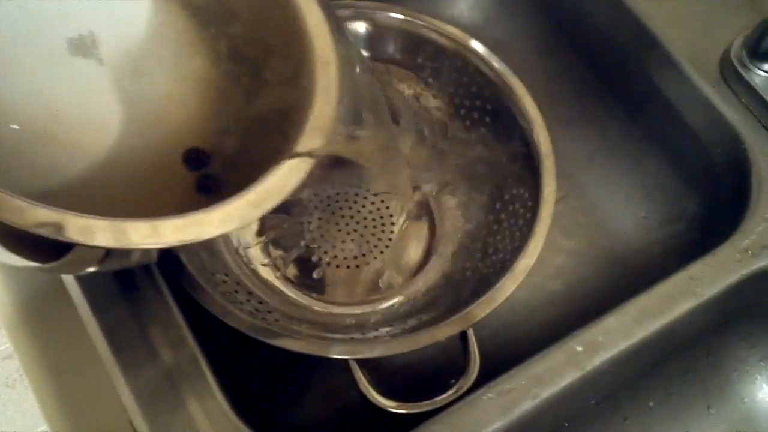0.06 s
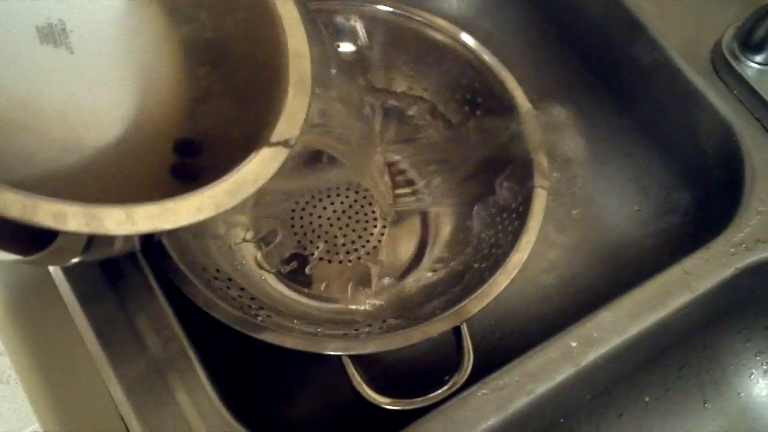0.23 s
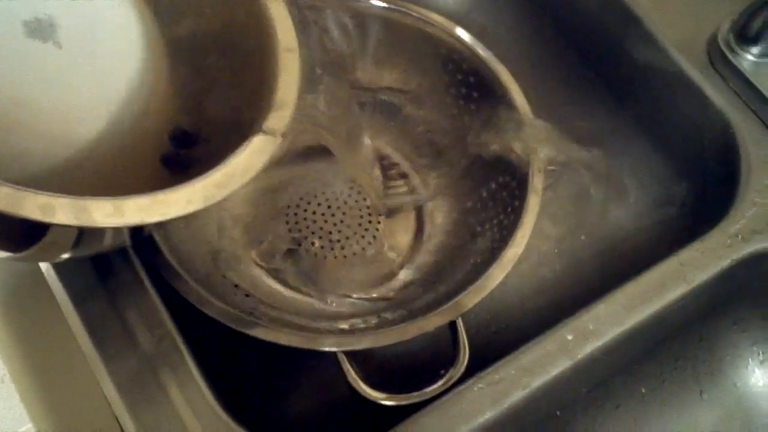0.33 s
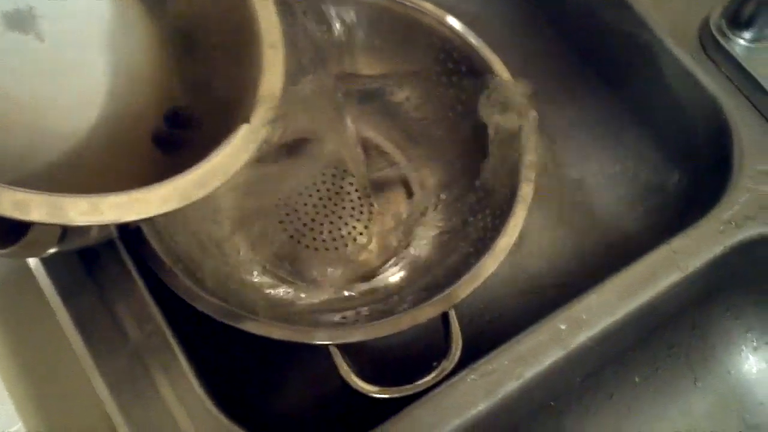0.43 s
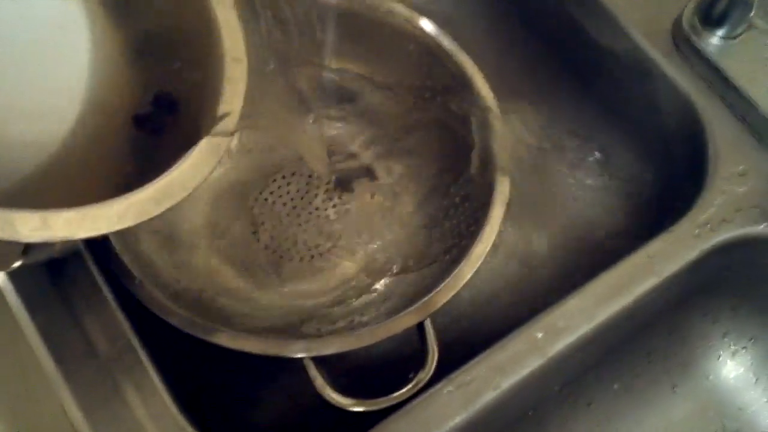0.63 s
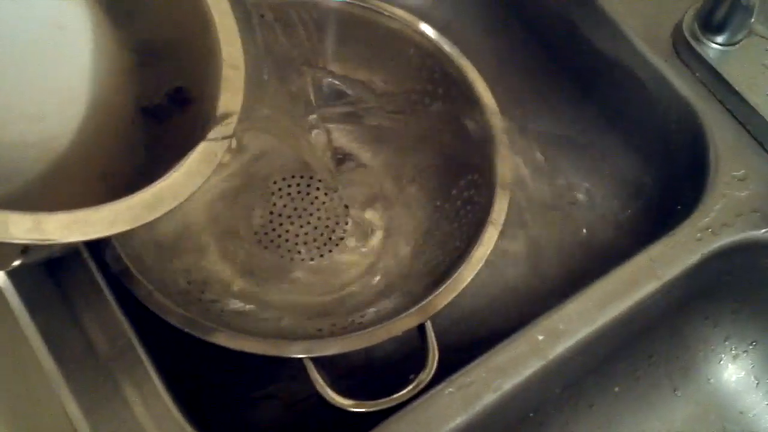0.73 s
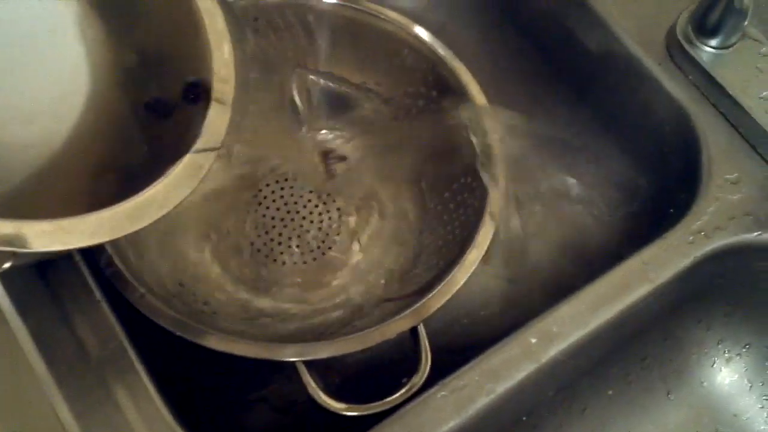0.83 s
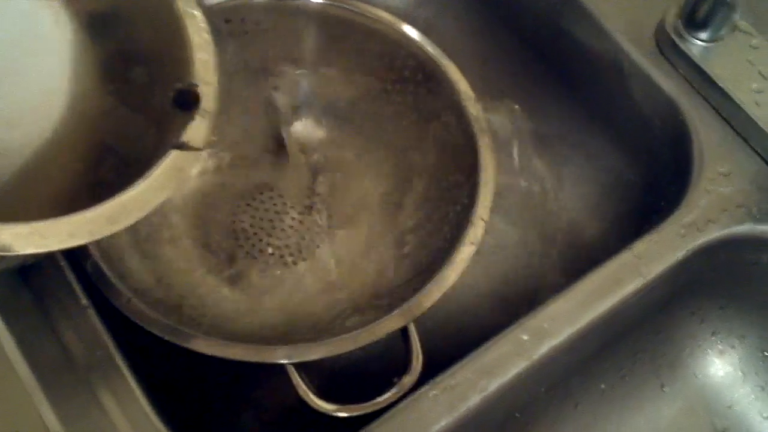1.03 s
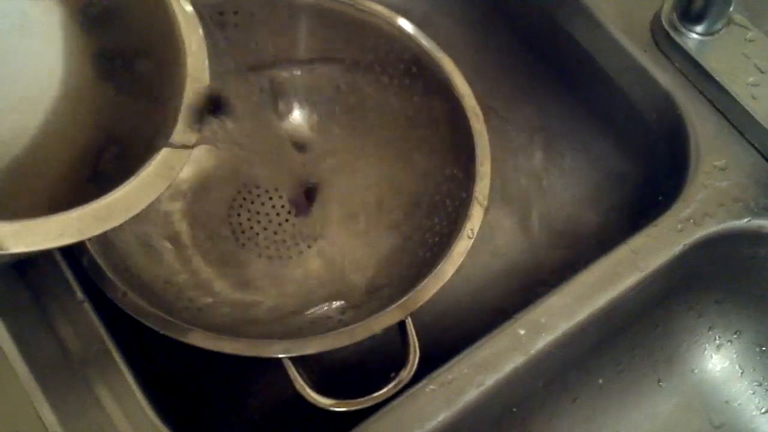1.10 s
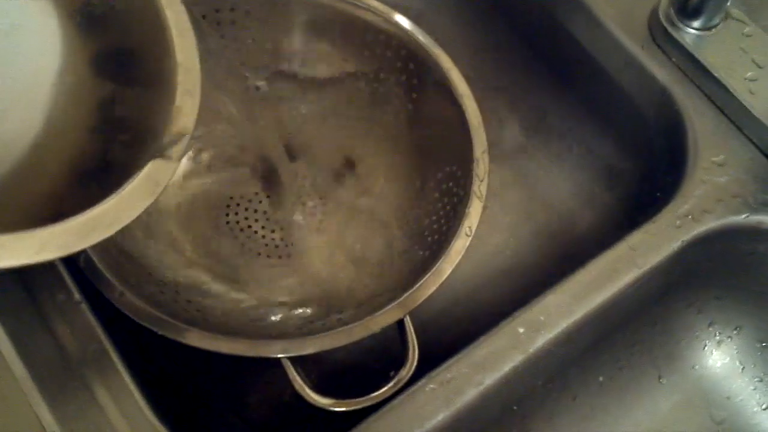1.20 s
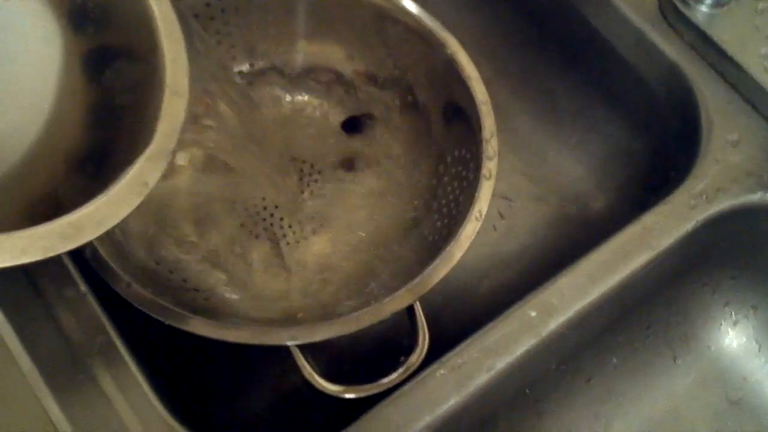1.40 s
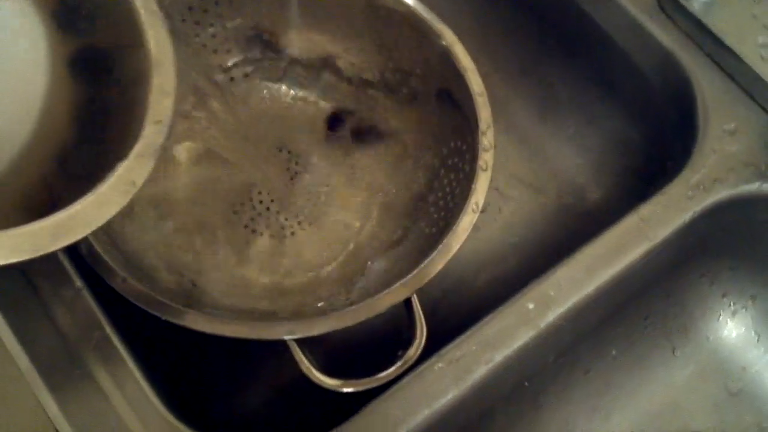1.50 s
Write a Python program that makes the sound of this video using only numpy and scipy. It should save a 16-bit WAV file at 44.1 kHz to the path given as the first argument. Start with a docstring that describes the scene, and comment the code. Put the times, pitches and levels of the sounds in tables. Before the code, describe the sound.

Water pours into a metal colander in a steel kitchen sink, hissing through the holes and splashing close by. It swells and bubbles, then two berries drop in with short metallic knocks, over a faint low rumble.

```python
"""A steel kitchen sink: water is poured from a bowl into a metal colander, over a low rumble.
Fine jets hiss through the holes and splashes burst on the mesh. The water churns, traps ringing
bubbles and drums on the sink. Two berries fall out and knock on the metal; the rim rings on.
Above the bass one channel is the other inverted and slightly late; the sides swap now and then."""
import sys
import numpy as np
from scipy import signal
from scipy.fft import rfft, irfft, next_fast_len
from scipy.io import wavfile

SR = 44100
rng = np.random.default_rng(int(sys.argv[2]) if len(sys.argv) > 2 else 0)


def output_pcm(signal):
    """Save a mono or channel-first signal as 16-bit PCM at the path in sys.argv[1].

    Samples are clipped to [-1, 1] before scaling.
    """
    pcm = np.clip(np.atleast_2d(signal).T, -1, 1) * 32767
    wavfile.write(sys.argv[1], SR, np.round(pcm).astype(np.int16))


N = 68355

# modes of colander and sink: pitch_hz, t60_s, water_db, first_berry_db, second_berry_db
METAL_MODES = [(220, 0.086, -8, -23, -10), (346.8, 0.13, 0, -6, -21), (396.5, 0.054, 0, -10, -4),
               (458, 0.096, -11.5, -0.5, -9.5), (542, 0.068, -5.5, -16, -7), (644.5, 0.049, -3.5, -4, -26),
               (700, 0.038, -6, -27, -9), (840, 0.06, -21, -19, -12.5), (1050, 0.018, -12, -9, -19),
               (1154, 0.018, -2, -10.5, -7.5), (1211, 0.017, -14, 0, -4), (1472, 0.066, -8, -11, -19.5),
               (1533, 0.014, 0, -8, -8), (1710, 0.017, 18, -5.5, -37), (2080, 0.014, -27, -45, -7.5),
               (2443, 0.022, -1, -2, -11)]
# long-ringing modes of the colander's rim: pitch_hz, t60_s, water_db, berry_db
RIM_MODES = [(315.2, 0.57, -42, -30), (373.8, 0.18, -37.5, -35), (658, 0.3, -39.5, -23.5),
             (966, 0.28, -44.5, -31.5), (1228, 0.29, -52, -24)]


def from_db(db):
    """Level to gain."""
    return 10 ** (np.asarray(db) / 20)


def rms_one(x):
    """Scale to rms 1."""
    return x / np.sqrt(np.mean(x ** 2) + 1e-20)


def envelope(rows):
    """Gain per sample from rows of time_s, level_db."""
    time_s, level_db = np.transpose(rows)
    return from_db(np.interp(np.arange(N) / SR, time_s, level_db))


def butterworth(x, order, edges_hz, kind):
    """Causal low, high or band pass."""
    return signal.sosfilt(signal.butter(order, edges_hz, kind, fs=SR, output="sos"), x)


def drift(rate_hz):
    """Smooth random curve, rms about 1."""
    hop, settle = 40, 2000
    pole = np.exp(-2 * np.pi * rate_hz * hop / SR)
    white = rng.standard_normal(N // hop + settle + 2)
    slow = signal.lfilter([1], [1, -2 * pole, pole * pole], white)[settle:]
    return np.interp(np.arange(N) / hop, np.arange(len(slow)), rms_one(slow))


def ring(force, pitch_hz, t60_s):
    """Resonator: a unit click starts a decaying sine of height 1."""
    radius, angle = from_db(-60 / (t60_s * SR)), 2 * np.pi * pitch_hz / SR
    return signal.lfilter([0, np.sin(angle)], [1, -2 * radius * np.cos(angle), radius ** 2], force + 1e-18)


def level_at(spectrum, hz):
    """Level in dB, interpolated over log frequency."""
    freq_hz, level_db = np.transpose(spectrum)
    return np.interp(np.log(hz), np.log(freq_hz), level_db)


def banded_noise(spectrum, patchy_db, together_db, rate_hz):
    """Third-octave noise bands flickering singly and together; rms 1."""
    out, together = 0, drift(rate_hz)
    low_hz, high_hz = spectrum[0][0], spectrum[-1][0]
    edges_hz = low_hz * 2 ** np.arange(0, np.log2(high_hz / low_hz) + .3, 1 / 3)
    white = rng.standard_normal((2, N))
    for k, (low, high) in enumerate(zip(edges_hz, edges_hz[1:])):
        band = butterworth(white[k % 2], 2, [low, high], "band")
        flicker_db = together_db * together + patchy_db * drift(rate_hz)
        out += from_db(level_at(spectrum, np.sqrt(low * high)) + flicker_db) * band
    return rms_one(out)


def grains(spectrum, per_s, spread_db, t60_cycles, pitches):
    """Clumped random clicks dealt to short resonators across a spectrum; rms 1."""
    sizes = from_db(spread_db * np.minimum(rng.exponential(1, N), 4)) * rng.choice([-1, 1], N)
    born = rng.random(N) < per_s * from_db(3.0 * drift(25)) / SR
    out, dealt = 0, rng.integers(0, pitches, N)
    for k, hz in enumerate(np.geomspace(spectrum[0][0], spectrum[-1][0], pitches)):
        clicks = sizes * born * (dealt == k)
        out += from_db(level_at(spectrum, hz)) * hz * ring(clicks, hz, t60_cycles / hz)
    return rms_one(out)


def rumble():
    """Low, wavering kitchen noise."""
    # rumble colour: freq_hz, density_db
    spectrum = [(60, -33), (90, 7.5), (120, 0), (170, 3.5), (240, 1.5), (400, 8)]
    return from_db(-53) * banded_noise(spectrum, patchy_db=3.0, together_db=-2.0, rate_hz=8.0)


def sink_hum():
    """Low hum in the sink: noise through one resonance twice."""
    # hum level: time_s, level_db
    levels = [(0, -70), (.6, -68.5), (.66, -54), (.78, -50.5), (.9, -57.5), (.98, -77), (1.45, -82),
              (1.52, -49.5), (1.55, -64)]
    pitch_hz, t60_s = 168.6, 0.087
    narrow_noise = ring(rng.standard_normal(N), pitch_hz, t60_s)
    return envelope(levels) * rms_one(ring(narrow_noise, pitch_hz, t60_s))


def metal(force, gains):
    """Colander and sink modes under a force; thin sheet radiates no bass."""
    modes = sum(gain * ring(force, hz, t60_s) for (hz, t60_s, *_), gain in zip(METAL_MODES, gains))
    return butterworth(modes, 4, 283, "high")


def rim(force, gains):
    """The rim sings on after the sheet has died."""
    return sum(gain * ring(force, hz, t60_s) for (hz, t60_s, *_), gain in zip(RIM_MODES, gains))


def drumming():
    """Falling water shakes the metal's low modes."""
    # drumming level: time_s, level_db
    levels = [(0, -48), (.2, -66), (.25, -48.5), (.4, -45), (.52, -42.5), (.62, -56), (.78, -60),
              (.93, -51), (.96, -35.5), (1.06, -44), (1.12, -37), (1.19, -31), (1.22, -45), (1.27, -39),
              (1.36, -39.5), (1.45, -47), (1.51, -40.5), (1.55, -55)]
    uneven_noise = rng.standard_normal(N) * from_db(2.2 * drift(50.0))
    force = butterworth(uneven_noise, 2, 534, "low")
    water_db, signs = np.transpose(METAL_MODES)[2], (-1) ** np.arange(len(METAL_MODES))
    return envelope(levels) * rms_one(metal(force, signs * from_db(water_db)))


def wash():
    """Churning water with small bubbles; it also rings the rim."""
    # wash level: time_s, level_db
    levels = [(0, -54), (.12, -53.5), (.25, -51), (.45, -48), (.6, -46), (.72, -47), (.8, -44.5),
              (.92, -43), (1.05, -42.5), (1.10, -35), (1.21, -45), (1.27, -37.5), (1.36, -45.5),
              (1.45, -47.5), (1.55, -49)]
    # wash colour: freq_hz, density_db
    spectrum = [(450, 7.5), (700, 3.5), (1000, 1), (1500, 1), (2200, 2), (3000, -6.5)]
    small_bubbles = grains(spectrum, per_s=400, spread_db=1.0, t60_cycles=22, pitches=30)
    churn = banded_noise(spectrum, patchy_db=2.2, together_db=.6, rate_hz=30.0)
    water_db = np.transpose(RIM_MODES)[2]
    ringing = rim(rng.standard_normal(N), from_db(water_db))
    return envelope(levels) * (churn + from_db(-8.5) * small_bubbles + ringing)


def large_bubbles():
    """Trapped air rings as unsteady sines that rise a little."""
    # bubbles: start_s, level_db, pitch_hz, t60_s
    bubbles = [(.258, -42.5, 1546, 0.047), (.456, -32, 2280, 0.058), (.534, -34.5, 1664, 0.075),
               (.736, -48, 2022, 0.072), (.825, -38.5, 1100, 0.26), (0.846, -30, 1900, 0.024),
               (.78, -36, 508, 0.11), (0.875, -29.5, 1021, 0.1), (0.938, -37, 1817, 0.22),
               (.983, -26.5, 1548, 0.069), (.986, -28, 1860, .03)]
    rise, attack_s, wobble_rad = 0.077, 0.0019, 0.45
    out, t = np.zeros(N), np.arange(N) / SR
    for start_s, level_db, pitch_hz, t60_s in bubbles:
        age_s = np.maximum(t - start_s, 0)
        glide = 1 + rise * np.minimum(age_s / t60_s, 1)
        phase = 2 * np.pi * pitch_hz * age_s * glide + wobble_rad * drift(48.0)
        out += from_db(level_db - 60 * age_s / t60_s) * np.minimum(age_s / attack_s, 1) * np.sin(phase)
    return out


def berry_knocks():
    """Each touch is a soft click striking the modes of its spot in step, plus a crack of noise."""
    # touches on the metal, one list per berry: start_s, level_db, cutoff_hz
    berries = [
        [(1.0747, -8, 4650), (1.0763, -12, 4500), (1.0778, -4, 3500), (1.083, -11.5, 1710)],
        [(1.2313, -11.5, 4140), (1.2343, -9.5, 2410), (1.2370, -11.5, 1740), (1.2425, -17, 1610),
         (1.269, -31, 865)],
    ]
    crack_db, crack_t60_s, crack_low_hz, crack_high_hz = -14.5, 0.032, 1500, 6000
    spots_db, rim_db = np.transpose(METAL_MODES)[3:], np.transpose(RIM_MODES)[3]
    out, crack_gain, t = np.zeros(N), np.zeros(N), np.arange(N) / SR
    for touches, spot_db in zip(berries, spots_db):
        force = np.zeros(N)
        for start_s, level_db, cutoff_hz in touches:
            click = np.zeros(N)
            click[int(start_s * SR)] = -from_db(level_db) * SR / (32 * cutoff_hz)
            force += butterworth(click, 2, cutoff_hz, "low")
            decay = (t >= start_s) * from_db(-60 * np.maximum(t - start_s, 0) / crack_t60_s)
            crack_gain += from_db(level_db + crack_db) * decay * cutoff_hz / crack_high_hz
        out += metal(force, from_db(spot_db)) + rim(force, from_db(rim_db))
    crack = crack_gain * rng.standard_normal(N)
    return out + butterworth(crack, 1, [crack_low_hz, crack_high_hz], "band")


def splashes():
    """Water hits the mesh: fast-starting, decaying noise bursts, each in its own band."""
    # splashes: start_s, level_db, centre_hz, width_hz, t60_s
    bursts = [(0.075, -43, 8940, 2050, 0.36), (0.199, -32, 6200, 1510, 0.072),
              (0.211, -31, 7100, 2950, 0.23), (0.277, -34, 7540, 6000, 0.48),
              (0.307, -39.5, 2430, 1000, 0.1), (0.335, -30.5, 6740, 2520, .08),
              (0.409, -26.5, 5700, 2340, 0.08), (0.48, -26, 8100, 4860, 0.034),
              (0.51, -37.5, 8400, 2500, 0.24), (0.559, -40, 6800, 1970, 0.28),
              (0.606, -32, 6140, 1500, 0.15), (0.642, -30, 5000, 1810, 0.096),
              (0.656, -22.5, 8500, 1990, 0.024), (0.677, -32, 8350, 1500, 0.033),
              (0.691, -33.5, 4850, 1490, 0.22), (0.731, -20, 6160, 3170, 0.08),
              (0.731, -33.5, 2210, 1270, 0.18), (.757, -22.5, 7340, 4100, 0.053),
              (0.798, -35.5, 6060, 2900, 0.21), (0.889, -30, 6000, 5500, 0.097),
              (0.965, -31.5, 9100, 6640, 0.37), (1.0739, -23.5, 4800, 6600, 0.089),
              (1.168, -34, 8300, 2480, 0.063), (1.224, -33, 8500, 2500, 0.041),
              (1.227, -29, 4800, 2560, 0.063), (1.232, -33, 6350, 5100, 0.15),
              (1.246, -36.5, 8600, 1990, 0.1), (1.271, -33.5, 5600, 2460, 0.11),
              (1.323, -26, 11600, 3000, 0.01)]
    attack_s = 0.001
    out, t = np.zeros(N), np.arange(N) / SR
    for start_s, level_db, centre_hz, width_hz, t60_s in bursts:
        edges_hz = np.clip([centre_hz - width_hz / 2, centre_hz + width_hz / 2], 300, .45 * SR)
        noise = rms_one(butterworth(rng.standard_normal(N), 3, edges_hz, "band"))
        age_s = np.maximum(t - start_s, 0)
        out += from_db(level_db - 60 * age_s / t60_s) * np.minimum(age_s / attack_s, 1) * noise
    return out


def droplet_ticks(per_s, size_db, t60_s):
    """Gain that jumps at each random droplet and falls back; rms 1."""
    jumps = (rng.random(N) < per_s / SR) * np.minimum(rng.exponential(1, N), 3)
    lift = signal.lfilter([1], [1, -from_db(-60 / (t60_s * SR))], jumps + 1e-18)
    return rms_one(1 + from_db(size_db) * lift)


def spray():
    """Fine jets hiss through the holes, with single drops among them."""
    # spray level: time_s, level_db
    levels = [(0, -46), (.1, -46.5), (.2, -40), (.384, -36.5), (.6, -37.5), (.8, -32.5), (.92, -32),
              (1.05, -36), (1.12, -38.5), (1.19, -40), (1.215, -44), (1.26, -41), (1.4, -40.5),
              (1.55, -38.5)]
    # spray colour: freq_hz, density_db
    spectrum = [(2500, -60), (3200, 4), (4000, -3.5), (5200, 5), (6500, 1), (8500, 7.5), (10500, -10.5),
                (12500, 2.5), (15500, -15)]
    drops = grains(spectrum, per_s=2500, spread_db=1.5, t60_cycles=39, pitches=24)
    ticks = droplet_ticks(per_s=40, size_db=-4.5, t60_s=0.045)
    hiss = banded_noise(spectrum, patchy_db=1.6, together_db=0.8, rate_hz=18.0)
    return envelope(levels) * ticks * (hiss + from_db(-5.5) * drops)


def scene():
    """All sources summed, the same in both channels."""
    mono = rumble() + spray() + splashes() + large_bubbles()
    mono += wash() + drumming() + sink_hum() + berry_knocks()
    return np.array([mono, mono])


def record(dry):
    """Right channel inverted and late, its bass only shifted and softer; bands swap sides; band limit."""
    # stereo bands: low_edge_hz, lean_sigma (positive favours a late right channel)
    bands = [(0, .5), (200, 1.0), (500, 1.1), (1470, .2), (2940, 0), (4410, -.5), (5880, 0), (7350, 1.1),
             (8820, 1.1), (10290, 1.1), (11760, .6), (13230, 0)]
    lag_s, swap_rate_hz, low_cut_hz, high_cut_hz = 15 / SR, 12.0, 107, 15700
    bass_phase_rad, bass_db, bass_edge_hz = 1.04, -4, 730
    size = next_fast_len(N + 4096)
    hz = np.arange(size // 2 + 1) * SR / size
    phase = np.minimum(np.pi - 2 * np.pi * hz * lag_s, bass_phase_rad)
    gain = from_db(bass_db / (1 + (hz / bass_edge_hz) ** 6))
    left, right = rfft(dry[0], size), rfft(dry[1], size) * gain * np.exp(1j * phase)
    mid, side = irfft(left + right, size)[:N] / 2, np.zeros(N)
    high_edges_hz = [edge for edge, _ in bands[1:]] + [SR]
    for (low_hz, lean), high_hz in zip(bands, high_edges_hz):
        band = irfft((left - right) / 2 * ((hz >= low_hz) & (hz < high_hz)), size)[:N]
        side += band * np.tanh(12 * (lean + drift(swap_rate_hz)))  # a sign flip swaps the channels
    stereo = butterworth([mid + side, mid - side], 4, low_cut_hz, "high")
    return signal.sosfilt(signal.ellip(12, .5, 80, high_cut_hz, fs=SR, output="sos"), stereo)


dry = scene()
out = record(dry)
output_pcm(out)
```